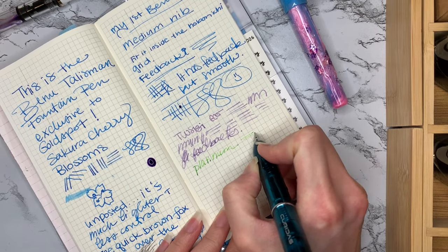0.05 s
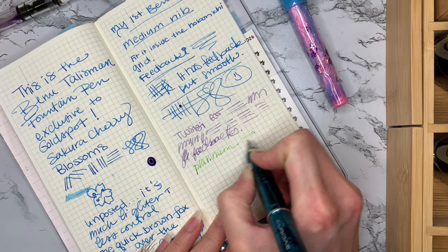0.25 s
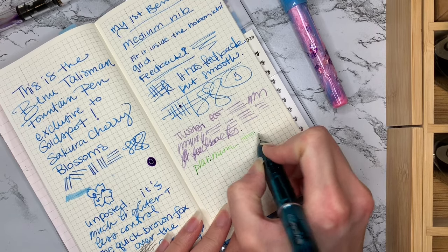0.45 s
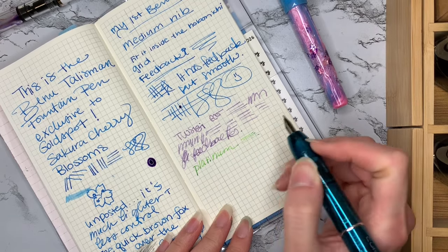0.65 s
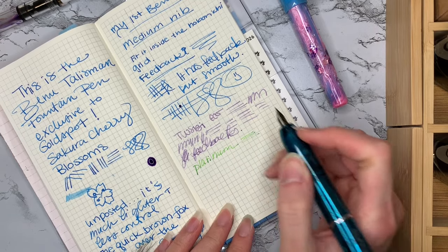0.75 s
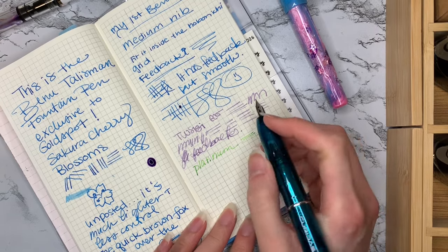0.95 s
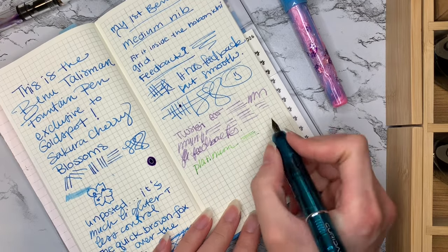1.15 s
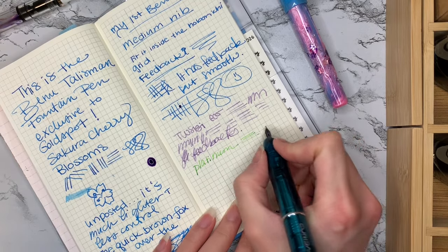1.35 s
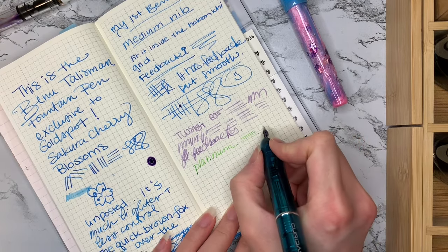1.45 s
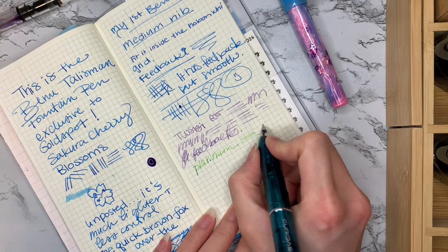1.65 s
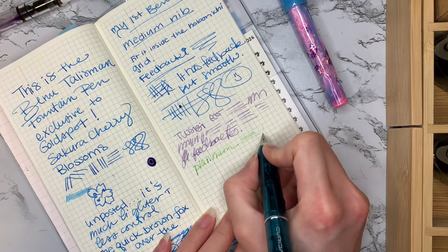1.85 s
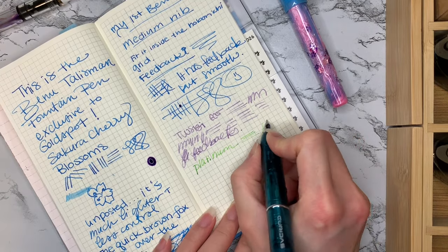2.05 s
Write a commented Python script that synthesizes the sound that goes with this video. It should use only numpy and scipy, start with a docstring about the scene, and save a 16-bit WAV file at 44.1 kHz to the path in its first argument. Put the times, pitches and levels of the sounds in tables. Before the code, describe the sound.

Scratchy pen strokes on paper, with soft hand rustles and light taps between, heard close

```python
"""A fountain pen scratches short strokes on a notebook page: random grains, as of plucked paper fibres, ring in
page and nib resonances. Between strokes the hand slides over the paper as finer grains in other resonances;
soft taps on the book, pen-barrel clicks and tiny ticks are struck resonances, with a short desk answer.
Behind them lie a rumbling, hissing room of shaped noise and a wavering mains hum.
Two close microphone ports give the stereo, by phase lead, likeness and level over frequency."""
import sys
import numpy as np
from scipy import signal
from scipy.fft import rfft, irfft, next_fast_len
from scipy.io import wavfile
from scipy.ndimage import uniform_filter1d, map_coordinates

SR = 44100
rng = np.random.default_rng(int(sys.argv[2]) if len(sys.argv) > 2 else 0)


def generate_wav(sig):
    """Save sig (samples, or channels by samples) to the path in sys.argv[1] as 16-bit PCM at SR."""
    pcm = np.round(np.clip(np.atleast_2d(sig).T, -1, 1) * 32767).astype(np.int16)
    wavfile.write(sys.argv[1], SR, pcm)


def magnitude_from_level(level_db):
    """Linear magnitude for a level in decibels (20 dB per decade)."""
    exponent = np.asarray(level_db, float) / 20
    return 10 ** exponent


N = 92610

# Phase by which the left port leads in the treble, for near sounds and room alike: f/Hz, lead/rad
TREBLE_LEAD = [(4750, 2.9), (5450, 3.4), (7200, 6.2), (9700, 6.33), (11300, 9.3), (13400, 9.5),
               (15000, 12.5)]


def unit(x):
    """Scales a signal to rms 1."""
    return x / np.sqrt(np.mean(x ** 2) + 1e-20)


def along(points, hz):
    """Reads (f/Hz, value) points on a log frequency axis."""
    f, v = np.transpose(points)
    return np.interp(np.log(hz + 1), np.log(f + 1), v)


def curves(rows):
    """Draws one dB curve per column over time; -120 dB outside the rows."""
    s, *columns = np.transpose(rows)
    t = np.arange(N) / SR
    return [np.interp(t, s, column, left=-120, right=-120) for column in columns]


def wobble(rate):
    """A smooth random curve with rate knots a second."""
    knots = rng.standard_normal(int(N * rate / SR) + 4)
    return map_coordinates(knots, [np.arange(N) * rate / SR])


def filtered(x, response):
    """Multiplies the spectrum by a complex response of frequency."""
    m = next_fast_len(N + SR // 2)
    return irfft(rfft(x, m) * response(np.fft.rfftfreq(m, 1 / SR)), m)[..., :N]


def body(x, peaks):
    """Parallel band-pass resonances (f/Hz, width/Hz, level/dB), alternating in sign."""
    def response(f):
        total = 0
        for k, (center, width, db) in enumerate(peaks):
            damping = 1j * f * width
            total = total + (-1) ** k * magnitude_from_level(db) * damping / (center * center - f * f + damping)
        return total
    return filtered(x, response)


def grains(per_s, spread_db):
    """Two trains of random one-sample impulses of uneven size."""
    hits = rng.random((2, N)) < per_s / SR
    size = rng.standard_normal((2, N))
    return hits * size * magnitude_from_level(spread_db * rng.standard_normal((2, N)))


def patchy(x, depth_db):
    """Random gain in patches of frequency and time, the same for both trains."""
    z = signal.stft(x, nperseg=512)[2]
    field = uniform_filter1d(rng.standard_normal(z.shape[1:]), size=2, axis=0)
    field = uniform_filter1d(field, size=3, axis=1)
    return signal.istft(z * magnitude_from_level(depth_db * unit(field)), nperseg=512)[1][:, :N]


def rubbed(level_db, train, peaks):
    """Friction: grains under a level curve ring in resonances, scaled by how loud the plain train rings."""
    return body(train * magnitude_from_level(level_db), peaks) / np.std(body(train, peaks))


def nib():
    """The nib plucks paper fibres; page and nib ring with them, brighter as the stroke gets louder."""
    # Strokes: nib treble over the page/dB, page tilt/dB per octave, [(t/s, level/dB)]
    strokes = [(-12.5, -2, [(0, -46), (.02, -59), (.06, -60)]), (-8.5, 9.5, [(.157, -63), (.164, -47.5),
               (.184, -56.5), (.196, -42)]), (-7.5, -4, [(.2, -47), (.215, -33.5), (.262, -22.5),
               (.29, -29), (.312, -36.5), (.325, -52), (.36, -72)]), (-13, 0.65, [(1.712, -53),
               (1.725, -48), (1.756, -36.5), (1.762, -29), (1.82, -29), (1.845, -43.5), (1.855, -56.5),
               (1.9, -67)]), (-18, -4, [(2.005, -69), (2.02, -47), (2.035, -87), (2.066, -62),
               (2.078, -43.5), (2.1, -33)])]
    # Page resonances, the lowest first: f/Hz, width/Hz, level/dB
    page_peaks = [(675, 165, 5.5), (913, 56, 10), (1056, 95, 5.5), (1493, 236, 5), (2040, 200, 2.5),
                  (2660, 220, -5.5)]
    # Nib resonances: f/Hz, width/Hz, level/dB
    nib_peaks = [(3130, 370, 10.5), (3786, 140, 7.5), (4140, 223, 10.5), (6430, 1200, 1), (7650, 360, 9.5),
                 (9600, 4500, -4)]
    fibres_per_s, fibre_spread_db = 14000, 2.5
    catch_db = 1.3  # the drag catches and lets go
    patch_db = 2.2  # the page answers unevenly from spot to spot
    treble_grows, low_grows = 0.28, 0.5  # extra dB per dB of level: nib, lowest page ring
    page_low_hz = 520  # the sound is thin below this

    catch = magnitude_from_level(catch_db * wobble(160))
    coarse = patchy(grains(fibres_per_s, fibre_spread_db) * catch, patch_db)
    fine = patchy(grains(fibres_per_s, fibre_spread_db) * catch, patch_db)
    out = 0
    for treble_db, tilt, rows in strokes:
        level_db = uniform_filter1d(np.maximum(curves(rows)[0], -95), size=SR // 150)
        below_top_db = level_db - level_db.max()
        page = [(hz, w, db + tilt * np.log2(hz / 1000)) for hz, w, db in page_peaks]
        # the more the page ring leans to the lows, the stronger the nib's top ring
        tip = [(hz, w, db - 1.5 * tilt * (hz > 9000)) for hz, w, db in nib_peaks]

        low = body(coarse * magnitude_from_level(level_db + low_grows * below_top_db), page[:1])
        upper = body(coarse * magnitude_from_level(level_db), page[1:])
        # minus carries on the alternating signs of the resonances
        page_ring = (low - upper) / np.std(body(coarse, page))
        nib_ring = rubbed(level_db + treble_db + treble_grows * below_top_db, fine, tip)
        out = out + page_ring + nib_ring
    return filtered(out, lambda f: (1j * f / (page_low_hz + 1j * f)) ** 2)


def hand():
    """Skin drags over the page: one train of grains rings in hollow, bright and low resonances."""
    # Slides: t/s, hollow 2 kHz band level/dB, treble level/dB, low rustle level/dB
    slides = [(.06, -69, -54, -65), (.65, -77.5, -99, -69), (.7, -57.5, -68, -55), (.8, -66, -66, -61),
              (.89, -53, -57.5, -47.5), (.98, -55.5, -65, -59.5), (1.03, -51, -48, -50.5),
              (1.1, -48, -46.5, -58.5), (1.135, -55, -52.5, -46), (1.18, -54.5, -51, -50.5),
              (1.22, -67, -60.5, -58), (1.33, -69.5, -87, -104)]
    # Resonances of each band: f/Hz, width/Hz, level/dB
    hollow_peaks = [(2130, 290, 0)]
    skin_peaks = [(5500, 280, 5), (9100, 9000, 4)]
    rustle_peaks = [(173, 98, 4.5), (505, 120, -2), (935, 440, -4.5), (1550, 395, -3.5)]
    hollow_db, skin_db, rustle_db = curves(slides)
    train = grains(7500, spread_db=1.5)
    uneven_db = 2 * wobble(60.86)
    hollow = rubbed(hollow_db, train, hollow_peaks)
    skin = rubbed(skin_db, train, skin_peaks)
    rustle = rubbed(rustle_db + uneven_db, train, rustle_peaks)
    return hollow + skin + rustle


def struck(rows, modes, attack_s, brush_db):
    """Each blow rings decaying sine modes anew, with a short brush of noise."""
    brush_t60 = 0.09  # s
    out, t = np.zeros(N + SR), np.arange(SR // 5) / SR
    for s, db, *hard in rows:
        ring = 0
        for hz, mode_db, t60 in modes:
            # hardness tilts the modes about 440 Hz; each blow also varies at random
            start_db = mode_db + sum(hard) * np.log2(hz / 440) + rng.normal(0, 1.5)
            ring = ring + magnitude_from_level(start_db - 60 * t / t60) * np.sin(2 * np.pi * hz * t)
        brush = magnitude_from_level(brush_db - 60 * t / brush_t60) * rng.standard_normal(len(t))
        attack = 1 - np.exp(-t / attack_s)
        out[round(s * SR):][:len(t)] += magnitude_from_level(db) * (ring + brush) * attack
    return out[:N]


def book_taps():
    """Soft taps ring the modes of the book."""
    # Taps: t/s, strength/dB, hardness/dB per octave
    taps = [(.4368, -34, 5.5), (.442, -32, 1.5), (.823, -42, -0.5), (.851, -53, 12), (.855, -48.5, -11),
            (.8755, -67, 14), (.88, -38.5, 5), (1.149, -44.5, 3), (1.159, -44.5, 5), (1.181, -50, -5),
            (1.236, -50, 3.5)]
    # Book modes: f/Hz, level/dB, t60/s
    book_modes = [(157, 3.1, 0.055), (454, 3, 0.043), (693.5, -6.5, 0.066), (1044, -4, 0.011),
                  (1544, -2, 0.009), (2155, -19, 0.019)]
    return struck(taps, book_modes, attack_s=0.0006, brush_db=-13)


def barrel_clicks():
    """The pen barrel clicks in the fingers, ringing two modes with a softer attack."""
    # Clicks: t/s, strength/dB
    clicks = [(.6785, -31), (.687, -34)]
    # Barrel modes: f/Hz, level/dB, t60/s
    barrel_modes = [(1720, -3, 0.032), (1922, 7.5, 0.02)]
    return struck(clicks, barrel_modes, attack_s=0.003, brush_db=-35)


def bright_ticks():
    """Tiny bright ticks: single impulses through one very wide treble resonance."""
    # Ticks: t/s, strength/dB
    tick_rows = [(1.6387, -27), (2.0014, -33)]
    impulses = np.zeros(N)
    for s, db in tick_rows:
        impulses[round(s * SR)] = magnitude_from_level(db)
    return body(impulses, [(9150, 45000, 0)])


def knocks():
    """Taps, clicks and ticks, and the desk's short answer as a decaying noise tail."""
    desk_t60, desk_db = 0.07, -9  # s, dB
    direct = book_taps() + barrel_clicks() + bright_ticks()
    tail = rng.standard_normal((2, SR // 5)) * magnitude_from_level(-60 * np.arange(SR // 5) / SR / desk_t60)
    answer = signal.fftconvolve(direct[None], tail / np.linalg.norm(tail[0]), axes=1)[:, :N]
    return [direct, 0 * direct] + magnitude_from_level(desk_db) * answer


def room():
    """Shaped noise, low rumble fading into flat hiss, with a mains hum that wavers in phase and level."""
    # Room noise spectrum: f/Hz, relative density/dB per Hz
    spectrum = [(28, -22.5), (55, 5.5), (95, 0), (180, -7), (340, -15), (800, -20), (2000, -25.5),
                (4500, -28.5), (14500, -26.5), (15500, -40)]
    room_db, hum_hz, hum_db = -50, 117.2, -56
    noise = rng.standard_normal((2, N))
    air = unit(filtered(noise, lambda hz: magnitude_from_level(along(spectrum, hz)) * (hz > 20)))
    phase = 2 * np.pi * hum_hz * np.arange(N) / SR + 1.5 * wobble(6.6)
    hum = np.sin(phase) * magnitude_from_level(hum_db + 3.0 * wobble(8.4))
    return magnitude_from_level(room_db) * air + [hum, 0 * hum]


def ports(pair, lead, alike):
    """A shared and an unshared part reach the two ports with a phase lead and a level difference."""
    # Likeness of the ports in the treble: f/Hz, likeness (0 to 1)
    treble_alike = [(4300, .55), (5100, .9), (6200, .8), (7100, .999), (9700, .999), (10500, .8),
                    (11400, .999), (13300, .999), (14200, .7), (15000, .999)]
    # Balance of the ports: f/Hz, left over right/dB
    left_db = [(60, -.8), (600, -2), (1250, .3), (2100, -4.5), (4200, 1.2), (6000, 0)]

    def split(hz):
        angle = np.arccos(np.clip(along(alike + treble_alike, hz), 0, 1)) / 2
        return np.array([np.cos(angle), np.sin(angle)])

    def left_and_right(hz):
        # each port takes half of the lead and of the level difference
        half = magnitude_from_level(along(left_db, hz) / 2) * np.exp(.5j * along(lead, hz))
        return np.array([half, 1 / half])

    same, other = filtered(pair, split)
    return filtered(np.array([same + other, same - other]), left_and_right)


def scene():
    """Near sounds and room, each with its own path to the ports."""
    # Phase by which the left port leads: f/Hz, lead/rad
    near_lead = [(60, -.2), (340, -1.4), (600, .4), (800, -.5), (2000, .3), (2600, 2),
                 (4200, 1.8)] + TREBLE_LEAD
    room_lead = [(240, -.2), (340, 2.9), (3600, 3.1), (4200, 1.8)] + TREBLE_LEAD
    # Likeness of the ports below the treble: f/Hz, likeness (0 to 1)
    near_alike = [(450, .5), (800, .94), (1800, .94), (2700, .5)]
    room_alike = [(110, .97), (300, .3), (700, .8), (1800, .4)]
    near = nib() + hand() + knocks()
    return ports(near, near_lead, near_alike) + ports(room(), room_lead, room_alike)


def roll_off(x):
    """The treble ends steeply here."""
    return signal.sosfilt(signal.butter(12, 16900, fs=SR, output="sos"), x)


def record(dry):
    """Cuts everything from 15830 Hz up and finishes the mix."""
    mix = filtered(dry, lambda hz: hz < 15830)
    return roll_off(mix)


dry = scene()
out = record(dry)
generate_wav(out)
```